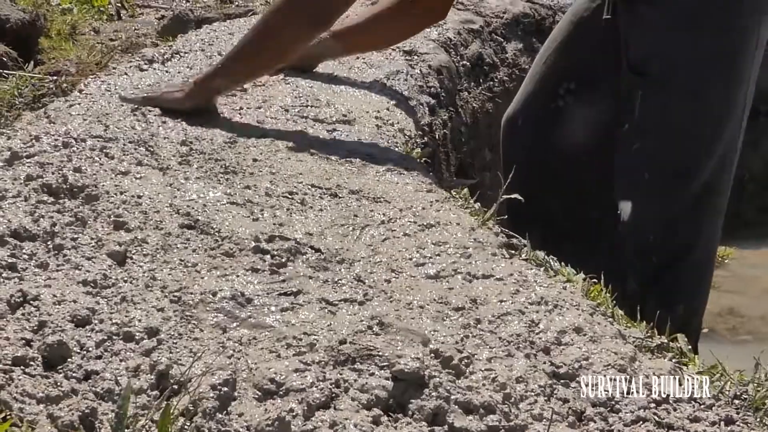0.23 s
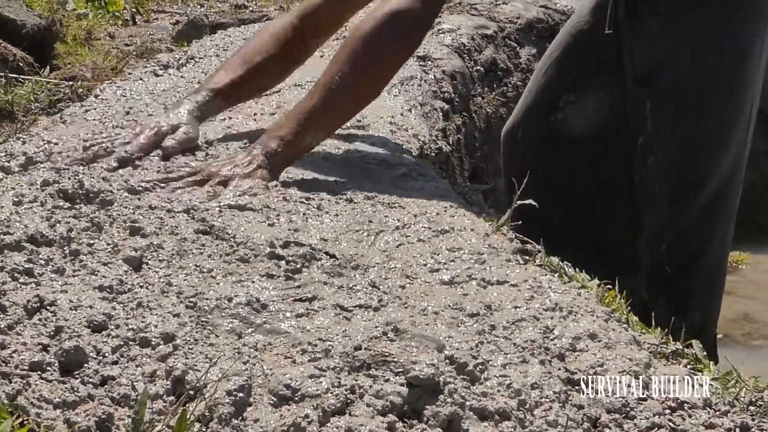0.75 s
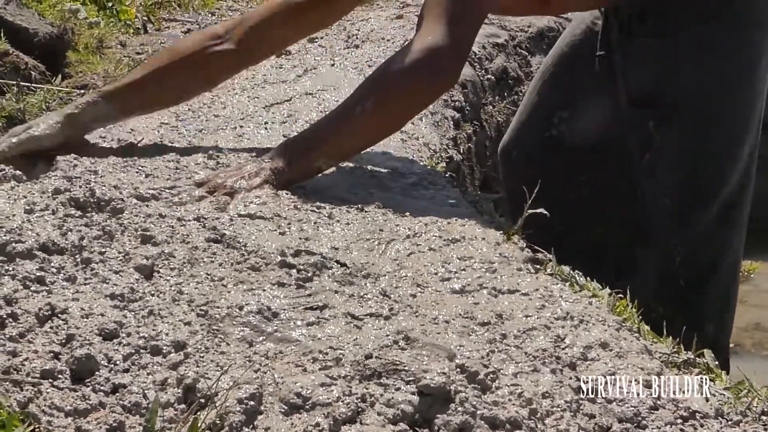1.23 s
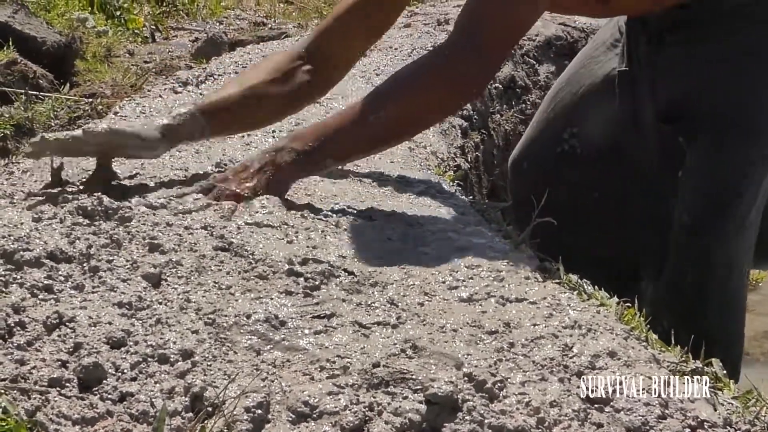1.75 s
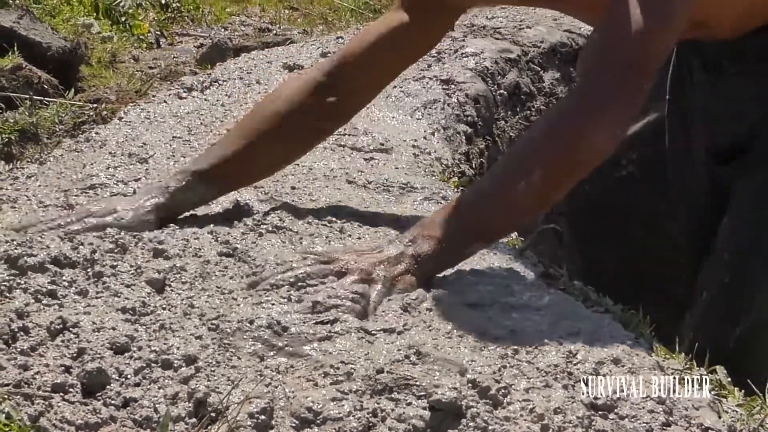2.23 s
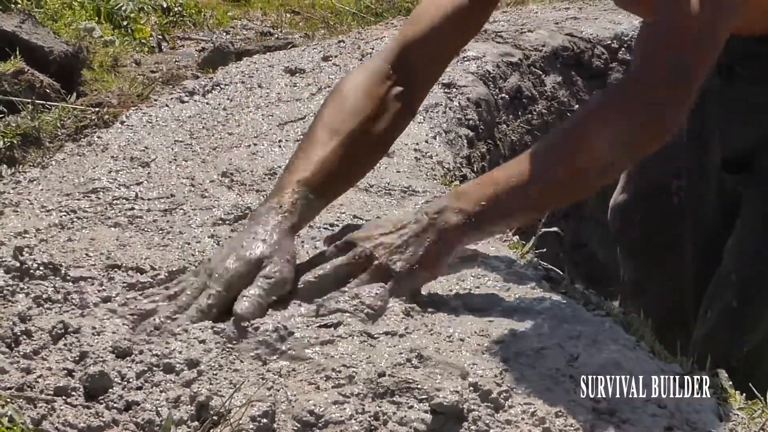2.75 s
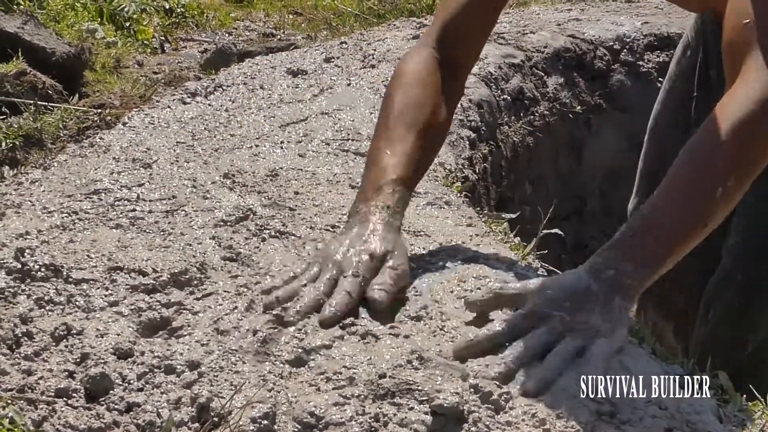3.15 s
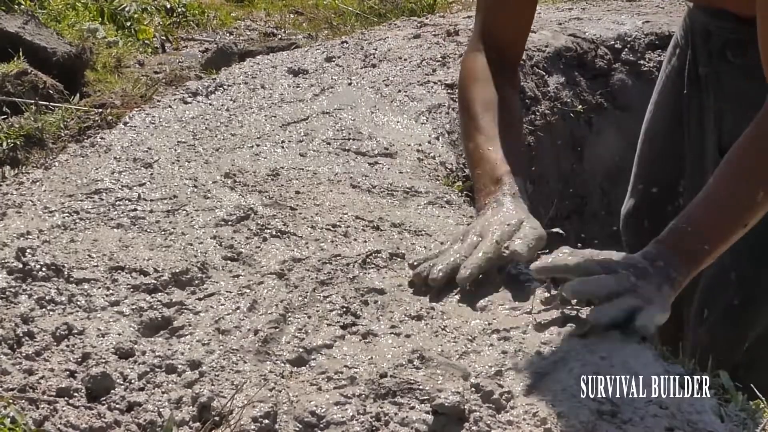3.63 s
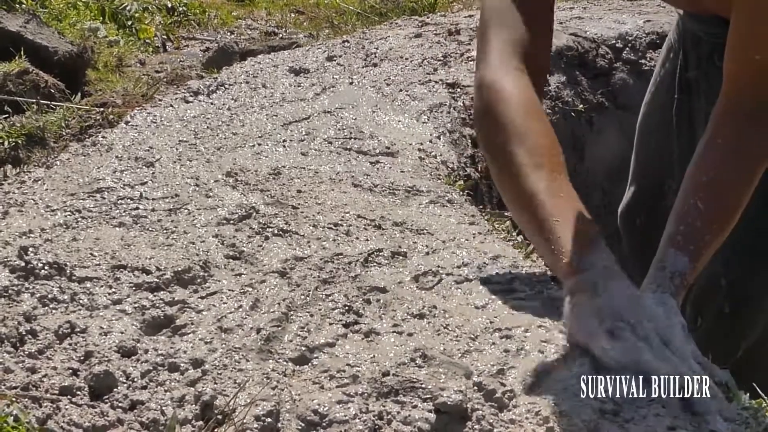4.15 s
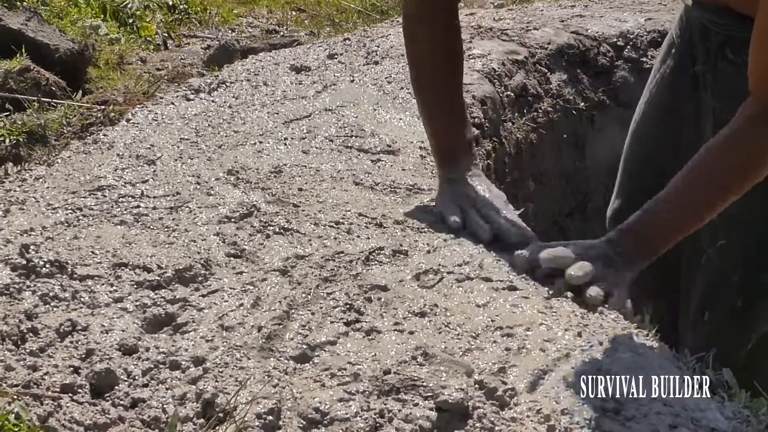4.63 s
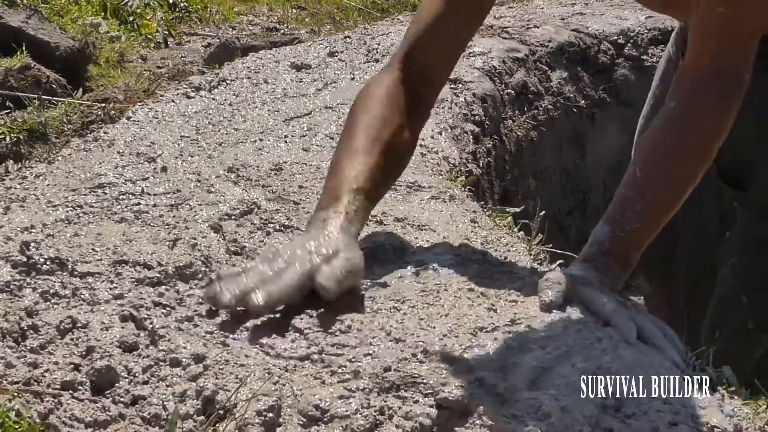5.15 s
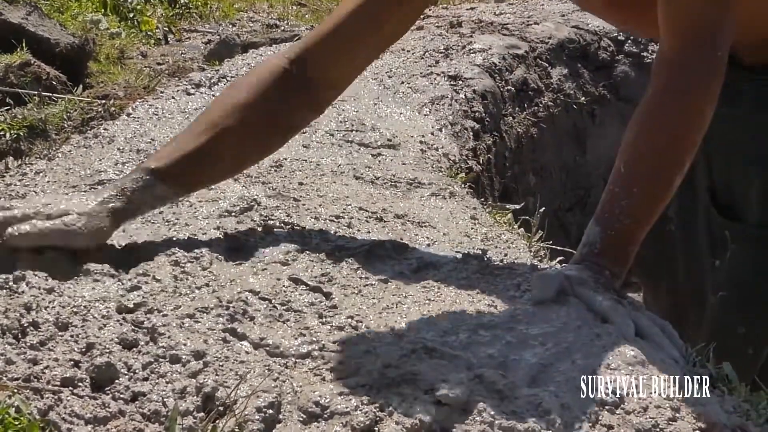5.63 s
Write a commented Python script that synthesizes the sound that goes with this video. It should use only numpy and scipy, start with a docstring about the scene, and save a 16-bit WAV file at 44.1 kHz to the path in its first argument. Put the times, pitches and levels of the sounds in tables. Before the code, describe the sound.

Close stereo sound of bare hands working wet gritty cement outdoors. Light clicks and small squelches come first, then louder irregular slaps with popping air pockets and spitting slurry from about two to four seconds. A quieter second of faint gritty rubbing follows, then a few strong smacks close it. A slow single-cylinder engine putters far off, with airy hiss and a dull swelling breeze.

```python
"""Bare hands pat and smooth wet, gritty concrete outdoors: air pockets ring and pop, slurry sprays as filtered
noise, the hands' weight knocks, and grit, squelch and water film crackle as clouds of damped sines.
A slow single-cylinder engine chugs some way off, as modes rung around each firing.
A breeze rushes over an open-air hiss, both shaped noise; a gain control ducks after the loudest moments."""
import sys
import numpy as np
from scipy import signal
from scipy.fft import rfft, irfft, next_fast_len
from scipy.io import wavfile
from scipy.ndimage import uniform_filter1d, map_coordinates

SR = 44100
rng = np.random.default_rng(int(sys.argv[2]) if len(sys.argv) > 2 else 0)


def unload_wav(signal):
    """Save mono or channel-first audio to the path in sys.argv[1] as 16-bit WAV at rate SR, clipped to [-1, 1]."""
    wavfile.write(
        sys.argv[1],
        SR,
        np.round(np.clip(np.atleast_2d(signal).T, -1, 1) * 32767).astype(np.int16),
    )


N = 259308

# Hands landing on the mix: (time [s], splash level [dB], build-up time constant [s], settling t60 [s],
# knock level [dB], knock frequency [Hz], push level [dB])
HAND_PATS = [(0.13, -47, .003, .05, -27, 560, -54), (0.345, -32, .0025, 0.06, -45, 500, -55),
             (0.455, -32.5, 0.0054, 0.027, -40, 503, -55), (.521, -34, 0.0024, 0.061, -51, 500, -55),
             (0.671, -34, .005, 0.16, -45, 500, -55), (0.72, -50, .003, .05, -25.5, 250, -44),
             (.96, -32.5, 0.0027, 0.039, -45, 500, -55), (1.23, -32, 0.0024, 0.077, -47, 500, -55),
             (1.325, -23.5, 0.00095, 0.021, -33, 500, -55), (1.346, -32.5, 0.0022, .097, -39, 503, -55),
             (1.465, -31, 0.0053, 0.031, -41, 500, -55), (1.717, -18, .0034, 0.049, -29.5, 243, -50),
             (1.917, -21, 0.0039, 0.044, -14, 478, -32), (2.115, -12, 0.003, 0.014, -27, 194, -44),
             (2.161, -32, .0028, 0.084, -45, 500, -55), (2.297, -24, 0.0044, 0.073, -45, 681, -43),
             (2.514, -35.5, 0.0018, 0.036, -47, 506, -52), (2.596, -38, 0.0041, 0.093, -29, 597, -48),
             (2.665, -51, 0.011, .043, -28, 576, -45), (2.776, -21.5, 0.0049, 0.1, -20, 700, -45),
             (2.966, -15.5, 0.00046, 0.064, -32, 845, -25), (3.061, -26, 0.0029, 0.023, -51, 497, -50),
             (3.184, -16, 0.0024, 0.041, -19.5, 266, -33), (3.361, -27, 0.01, 0.047, -39, 496, -58.5),
             (3.406, -18, .0018, .057, -25.5, 540, -42), (3.577, -24, 0.0037, 0.056, -35, 278, -41),
             (3.627, -28.5, .0015, .07, -19.5, 770, -23), (3.827, -24.5, 0.0041, 0.03, -47, 500, -50),
             (5.037, -30.5, 0.0067, 0.086, -31, 710, -55), (5.052, -44, 0.0028, .05, -28, 298, -46),
             (5.267, -20, 0.0035, 0.084, -10.5, 555, -25), (5.464, -19, .0011, 0.081, -14.5, 587, -19),
             (5.602, -23.5, .0043, 0.059, -21, 814, -48), (5.778, -22.5, 0.0046, 0.037, -26.5, 846, -47)]


def amp(db):
    """Level law: 20 dB is a factor of ten in amplitude."""
    return 10 ** (np.asarray(db) / 20)


def unit(x):
    """Power normalization: scale to rms 1."""
    return x / np.sqrt(np.mean(x ** 2) + 1e-20)


def along(points, hz, axis=1):
    """Logarithmic frequency scale: interpolate one column of (frequency, value, ..) points."""
    columns = np.transpose(points)
    return np.interp(np.log(hz + 1), np.log(columns[0] + 1), columns[axis])


def curves(rows):
    """Linear interpolation in time: one value per sample for each column after the time."""
    times, *columns = np.transpose(rows)
    t = np.arange(N) / SR
    return [np.interp(t, times, column) for column in columns]


def wobble(rate):
    """Band-limited fluctuation: a smooth curve through random knots, rate of them a second."""
    knots = rng.standard_normal(int(N * rate / SR) + 4)
    return map_coordinates(knots, [np.arange(N) * rate / SR])


def filtered(x, response):
    """Linear filtering: the spectrum times a complex response of frequency."""
    size = next_fast_len(N + SR // 2)
    hz = np.fft.rfftfreq(size, 1 / SR)
    return irfft(rfft(x, size) * response(hz), size)[..., :N]


def laid(times, shapes):
    """Superposition: rows of short shapes summed at their start times."""
    at = np.round(times * SR).astype(int)[:, None] + np.arange(shapes.shape[1])
    at = np.where(at < 0, N, np.minimum(at, N))  # slot N collects what falls outside
    return np.bincount(at.ravel(), shapes.ravel(), N + 1)[:N]


def fading(t, t60, rise):
    """Exponential decay: a quick rise, then a fall of 60 dB in t60 (2 ms at least)."""
    decay = amp(-60 * t / np.maximum(t60, .002))
    return decay * (1 - np.exp(-t / rise))


def grains(count, hz, spread, cycles, spike_db):
    """Granular noise: soft-starting damped sines at random moments, pitches and sizes; rms 1."""
    when, chance = rng.random((2, count))
    pitch = hz * np.exp(spread * rng.standard_normal((count, 1)))
    pitch = np.clip(pitch, 500, 16000)
    turns = pitch * np.arange(300) / SR
    size = amp(-spike_db * np.log(1 - .985 * chance))[:, None]  # exponentially spread in dB, capped
    shapes = size * turns * np.exp(-turns / cycles) * np.sin(2 * np.pi * turns)
    return unit(laid(when * N / SR, shapes))


def rubbing():
    """Friction as many micro-impacts: pockets squelch, grit ticks and water film fizzes, in clumps."""
    # palms sliding: (time [s], grit level [dB], squelch level [dB])
    sliding = [(0, -44.5, -49), (.11, -45.5, -44), (.22, -61, -49.5), (.42, -43.5, -48), (.5, -52, -53.5),
               (.6, -45, -51.5), (.77, -45, -53.5), (.9, -60, -46), (1.08, -50.5, -53), (1.17, -69, -55),
               (1.33, -51.5, -48), (1.64, -57, -50), (2.05, -49.5, -54), (2.2, -45.5, -50), (2.4, -55, -53),
               (2.65, -52, -49.5), (2.85, -58, -53), (3.3, -50, -49), (3.73, -54, -53), (4.0, -54.5, -55),
               (4.4, -58.5, -42), (4.48, -47, -55.5), (4.6, -49.5, -47.5), (4.72, -55, -52),
               (4.86, -45.5, -55), (4.94, -56.5, -49), (5.03, -44, -43.5), (5.2, -57, -59),
               (5.45, -55, -48), (5.65, -49.5, -57.5), (5.88, -51, -58)]
    grit_db, squelch_db = curves(sliding)
    clumps = wobble(35)
    squelch = grains(count=4000, hz=1492, spread=0.248, cycles=3.0, spike_db=2)
    squelch = amp(squelch_db + 0.87 * clumps) * squelch
    grit = grains(count=6000, hz=3550, spread=0.375, cycles=1.6, spike_db=3.0)
    grit = amp(grit_db + 2.3 * clumps) * grit
    film = [grains(count=9000, hz=10200, spread=0.46, cycles=0.46, spike_db=2.0) for k in range(3)]
    film_pair = np.array([film[0] + 0.28 * film[1], film[0] + 0.62 * film[2]])  # partly unlike, left and right
    fizz = amp(grit_db - 3.5 + 2.6 * clumps) * film_pair
    return squelch + grit + fizz


def engine():
    """Periodic excitation of damped modes: several ring around each firing, at slightly changing strengths."""
    # modes of one engine cycle: (delay after firing [s], frequency [Hz], level [dB], t60 before the taper [s])
    modes = [(-.0073, 95, -37, .125), (-.0044, 187, -44, .25), (.0178, 175, -45, .4),
             (.0191, 236, -42, .27), (.0342, 155, -40, .03), (.0344, 295, -50, .4), (.0652, 165, -47, .35)]
    first_firing_s, firing_hz = .0225, 8.949
    firings = first_firing_s + np.arange(-2, int(N / SR * firing_hz) + 1) / firing_hz
    t = np.arange(SR // 5) / SR
    taper = np.cos(2.5 * np.pi * t)  # reaches zero at 0.2 s
    chug = 0
    for delay, hz, db, t60 in modes:
        late, strength = rng.standard_normal((len(firings), 2)).T
        ring = amp(db) * fading(t, t60, .002) * np.sin(2 * np.pi * hz * t) * taper
        sizes = amp(1.3 * strength)[:, None]
        chug = chug + laid(firings + delay + .00012 * late, sizes * ring)
    return chug


def rush(spectrum, alike):
    """Partial coherence: mid and side noise mixed for a given colour and left-right likeness; rms 1."""
    def shape(hz):
        angle = np.arccos(np.clip(along(alike, hz), -1, 1)) / 2
        return amp(along(spectrum, hz)) * [np.cos(angle), np.sin(angle)]
    mid, side = filtered(rng.standard_normal((2, N)), shape)
    return unit(np.array([mid + side, mid - side]))


def outdoors():
    """Turbulence as shaped noise: a swelling breeze, dull and hollow, over a lasting hiss."""
    # breeze strength: (time [s], level [dB])
    breeze_levels = [(0, -52.5), (.75, -54.5), (1.55, -53.5), (1.8, -44), (2.1, -40), (2.35, -39),
                     (2.6, -50), (3.0, -54.5), (4.9, -53.5), (5.2, -52), (5.55, -43.5), (5.88, -40.5)]
    # breeze colour: (frequency [Hz], relative density [dB per Hz])
    breeze_colour = [(60, -40), (250, -14), (330, -6), (400, 0), (500, -5), (750, -8), (1000, -13),
                     (1900, -17), (3000, -34), (20000, -70)]
    # open-air colour: (frequency [Hz], relative density [dB per Hz])
    air_colour = [(40, 4.5), (100, -2), (200, -0.5), (300, 1), (400, -24), (800, -3), (1200, -17),
                  (2300, -13), (5000, -16.5), (7600, -22), (10000, -17.5), (16000, -28)]
    # open-air coherence: (frequency [Hz], left-right likeness [1 = same])
    air_likeness = [(60, 0.25), (300, 0.084), (700, 0.07), (1400, 0.85), (3000, 0.14), (7000, 0.91),
                    (15000, 0.1)]
    breeze_db, = curves(breeze_levels)
    breeze = amp(breeze_db + 1.6 * wobble(12)) * rush(breeze_colour, [(300, 0.11)])
    hiss = amp(-44.0 + 1.9 * wobble(2.69)) * rush(air_colour, air_likeness)
    return breeze + hiss


def slurry():
    """Intermittent noise: spiky, broadband, rms 1, partly unlike at left and right."""
    # spray colour: (frequency [Hz], relative density [dB per Hz])
    spray_colour = [(200, -24), (500, -4.5), (1000, -8), (1400, 0), (2800, 2), (5000, 1), (7600, -3.5),
                    (10000, -3), (14000, -4.5), (20000, -36)]
    crackle = rng.standard_normal((3, N)) * amp(3.07 * wobble(1500))
    pair = crackle[0] + 0.26 * crackle[1:]
    return unit(filtered(pair, lambda hz: amp(along(spray_colour, hz))))


def pops():
    """Cavity resonance: each bursting air pocket rings a few unsteady cycles and throws a spray."""
    # bursting pockets: (time [s], pop level [dB], pocket frequency [Hz], spray level [dB], pop t60 [s])
    pockets = [(0.0056, -32, 3250, -50, 0.01), (0.0567, -19, 1450, -52, 0.0067),
               (0.0915, -24, 1380, -41, 0.026), (0.1508, -25, 1340, -54, 0.011),
               (0.272, -38, 6900, -29, 0.006), (0.2974, -37.5, 2910, -24, 0.0057),
               (0.3145, -35, 4700, -21, 0.0046), (0.3478, -25, 7000, -18.5, 0.0098),
               (0.356, -23.5, 1790, -23, 0.016), (0.383, -30, 5000, -19, 0.0039),
               (0.4033, -28.5, 1570, -37, 0.031), (0.453, -32, 6000, -26, 0.008),
               (0.4384, -18.5, 2200, -46, 0.0025), (0.5247, -22, 7200, -46.5, 0.0019),
               (0.5514, -23, 2780, -24, 0.0071), (0.6168, -23, 4370, -24, 0.0029),
               (0.649, -24.5, 1550, -56, 0.016), (0.6692, -18, 1600, -45, 0.0099),
               (0.685, -19.5, 2000, -24, 0.0082), (0.721, -23.5, 1560, -42, 0.0083),
               (0.741, -32, 2670, -27.5, 0.022), (0.7543, -21, 2260, -35, 0.012),
               (0.9595, -24, 6860, -36, 0.0074), (0.983, -28, 2870, -31, 0.0095),
               (1.0829, -29.5, 2170, -47, 0.034), (1.235, -23, 3540, -17.5, 0.0043),
               (1.2791, -37, 6800, -24, 0.0085), (1.3233, -24, 6520, -33, 0.011),
               (1.4369, -17, 1290, -20.5, 0.005), (1.4669, -16.5, 7500, -21.5, 0.0064),
               (1.5032, -32.5, 2070, -37, 0.018), (1.707, -38, 3200, -25, 0.022),
               (1.717, -16.5, 3200, -15.5, 0.019), (1.7228, -14, 4470, -31, 0.0055),
               (1.896, -33, 1650, -48, 0.029), (1.9134, -15, 2630, -10, 0.019),
               (1.915, -15, 1370, -25, 0.0091), (1.9191, -1, 1584, -31, 0.007),
               (2.11, -21, 2720, -38, 0.016), (2.112, -5.5, 3230, -6, 0.0041),
               (2.1163, -0.5, 2910, -10.5, 0.007), (2.16, -26, 2860, -29, 0.022),
               (2.1827, -29, 4130, -29, 0.011), (2.293, -3.5, 2180, -32, 0.0043),
               (2.2966, -18.5, 4340, -13, 0.057), (2.299, -8, 4920, -48.5, 0.011),
               (2.3044, -26, 5000, -21, 0.0054), (2.517, -24, 9000, -33, 0.008),
               (2.5996, -20, 2100, -27, 0.0044), (2.634, -21, 2730, -18, 0.0037),
               (2.656, -27.5, 3880, -38, 0.008), (2.7759, -21, 1300, -21.5, 0.026),
               (2.7844, -16, 3350, -8.5, 0.026), (2.796, -30, 3550, -32, 0.04),
               (2.966, -4.5, 4130, -42, 0.0074), (2.9779, -9, 1417, -20, 0.03),
               (2.9925, -25, 1463, -21, 0.016), (3.0623, -27, 3020, -21.5, 0.037),
               (3.064, -10, 2745, -16, 0.016), (3.066, -15.5, 1960, -13, 0.01),
               (3.137, -33, 5000, -45, 0.01), (3.185, -3, 2670, -5.5, 0.0053),
               (3.187, -5, 1170, -60, 0.0053), (3.2599, -20, 1880, -56, 0.013),
               (3.3527, -19, 1960, -53, 0.0084), (3.3608, -24, 2860, -26, 0.014),
               (3.3996, -19, 4220, -15, 0.005), (3.404, -5.5, 6600, -20, 0.002),
               (3.4071, -15.5, 2730, -14, 0.013), (3.4164, -21, 2780, -47, 0.036),
               (3.5696, -33, 2880, -60, 0.014), (3.5755, -4, 1920, -17, 0.0036),
               (3.5858, -20, 3870, -24, 0.0078), (3.6227, -12, 2540, -41, 0.017),
               (3.6274, -4.5, 6440, -3.5, 0.0078), (3.629, -7.5, 1224, -39.5, 0.01),
               (3.7046, -26, 2200, -58, 0.015), (3.737, -34, 4000, -38, 0.012),
               (3.814, -29, 4180, -28, 0.015), (3.826, -9.5, 3960, -10.5, 0.0083),
               (4.1332, -33.5, 1210, -57, 0.071), (4.485, -36, 2880, -35.5, 0.046),
               (4.5497, -27.5, 1125, -54, 0.031), (4.8443, -32, 4100, -40, 0.013),
               (4.9766, -29, 2740, -40, 0.025), (4.9849, -17.5, 1850, -33, 0.016),
               (5.002, -16, 2990, -47, 0.0083), (5.033, -12, 2700, -41, 0.003),
               (5.0377, -18, 4520, -22, 0.021), (5.044, -16, 2900, -51.5, 0.0056),
               (5.0728, -38, 6070, -31, 0.006), (5.096, -28, 1210, -37, 0.035),
               (5.267, -6.5, 1944, -18, 0.013), (5.2696, -3, 2820, -2, 0.0055),
               (5.269, -14, 1730, -36.5, 0.01), (5.2762, -15, 4300, -41, 0.0088),
               (5.467, -9.5, 2750, -5.5, 0.012), (5.469, -7.5, 1360, -37, 0.0099),
               (5.591, -30, 2190, -36, 0.045), (5.6028, -7.5, 3150, -5, 0.0043),
               (5.611, -24, 4020, -18.5, 0.038), (5.7773, -25, 2790, -19, 0.032)]
    s, pop_db, hz, spray_db, t60 = np.transpose(pockets)[:, :, None]
    # the hands sit a little left, each pocket somewhere else
    pan_db = 1.5 + rng.standard_normal((len(s), 1))
    t = np.arange(SR // 16) / SR
    # the pocket changes shape as it empties
    drift = np.cumsum(rng.standard_normal((len(s), len(t))), axis=1) * np.sqrt(hz / 140000)
    ring = amp(pop_db) * fading(t, t60, 0.25 / hz) * np.sin(2 * np.pi * hz * t + drift)
    bursts = amp(spray_db) * fading(t, 0.89 * t60, 0.00032)
    spray = laid(s[:, 0], bursts) * slurry()
    return spray + [laid(s[:, 0], ring * amp(side * pan_db / 2)) for side in (1, -1)]


def splashes():
    """Noise under an envelope: it swells as the skin presses in, then the slurry spits as it settles."""
    s, db, build, t60, *_ = np.transpose(HAND_PATS)[:, :, None]
    t = np.arange(-SR // 20, SR // 8) / SR  # zero at the peak
    pressing = np.exp(t / np.maximum(build, .0005))
    swell = np.where(t < 0, pressing, amp(-60 * t / t60))
    return laid(s[:, 0] + t[0], amp(db) * swell) * slurry()


def thuds():
    """Heavily damped impact: a lumpy knock that barely rings, over one broad push of the hand's weight."""
    s, _, _, _, knock_db, hz, push_db = np.transpose(HAND_PATS)[:, :, None]
    t = np.arange(SR // 10) / SR
    drift = np.cumsum(rng.standard_normal((2, len(s), len(t))), axis=2) * 0.1  # the mix yields unevenly
    low = np.sin(2 * np.pi * hz * t + drift[0])
    high = .5 * np.sin(2 * np.pi * 1.574 * hz * t + drift[1])
    knock = amp(knock_db) * fading(t, 0.027, 0.00083) * (low + high)
    u = t / 0.00057
    push = amp(push_db) * u * (2 - u) * np.exp(-u)  # a pulse and its rebound
    lag_s = .0012  # the weight arrives just after the splash peaks
    return laid(s[:, 0] + lag_s, knock + push)


def scatter(x):
    """Diffuse reflection: rough ground returns a brief smear, unlike at left and right, new each 0.1 s."""
    t, step = np.arange(SR // 20) / SR, SR // 10
    back = np.zeros((2, N + step + len(t)))
    for start in range(0, N, step):
        tail = rng.standard_normal((2, len(t))) * fading(t, 0.064, 0.00068)
        tail = tail / np.linalg.norm(tail[0])
        smear = signal.fftconvolve(x[:, start:start + step], tail, axes=1)
        back[:, start:start + smear.shape[1]] += smear
    return back[:, :N]


def scene():
    """Superposition: the hands with their reflections, the engine and the open air."""
    hands = pops() + splashes() + thuds() + rubbing()
    # a second path off the slab, a quarter metre longer
    bounce = lambda hz: 1 + .25 * np.exp(-2j * np.pi * hz / 1390)
    return filtered(hands, bounce) + amp(-8.5) * scatter(hands) + engine() + outdoors()


def record(dry):
    """Transduction and compression: low cut, uneven microphone pair, ducking gain, soft limit, high cut."""
    # microphone pair: (frequency [Hz], left over right [dB], left phase lead [rad])
    port_differences = [(101, 6, 0.22), (428, 4.5, -1.28), (680, 5, -0.0098), (1230, 1, -1.14),
                        (2450, 0.5, -0.37), (8600, -0.5, 0.57), (15000, -2.5, -1.05)]

    def pair(hz):
        lean = amp(along(port_differences, hz) / 2) * np.exp(.5j * along(port_differences, hz, axis=2))
        low_cut = np.sqrt(1 + (90 / (hz + 1)) ** 6)
        return np.array([lean, 1 / lean]) / low_cut

    x = filtered(dry, pair)
    power = uniform_filter1d(np.mean(x ** 2, axis=0), size=441)  # over 10 ms
    loud_db = 10 * np.log10(np.abs(power) + 1e-12)
    excess_db = np.pad(np.maximum(loud_db + 17.5, 0), (500, 0))[:N]  # acts 500 samples late
    release_s = .11
    duck_db = signal.lfilter([1], [1, -np.exp(-1 / (SR * release_s))], excess_db) * 4.47 / 1000
    x = x * amp(-duck_db)
    x = x / (1 + np.abs(x / .93) ** 8) ** (1 / 8)  # soft limit
    top_hz, end_hz = 15750, 16950  # a fifth of the amplitude passes between them, nothing above
    return filtered(x, lambda hz: (hz < top_hz) + .2 * (hz >= top_hz) * (hz < end_hz))


dry = scene()
out = record(dry)
unload_wav(out)
```